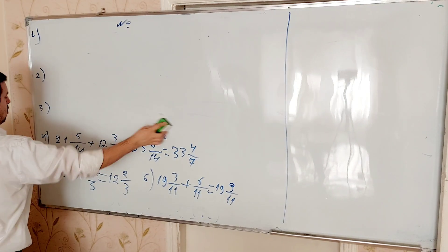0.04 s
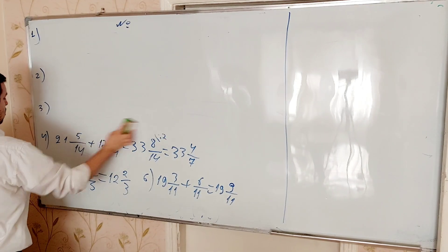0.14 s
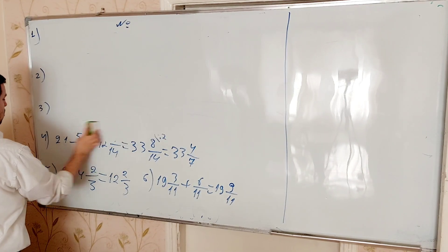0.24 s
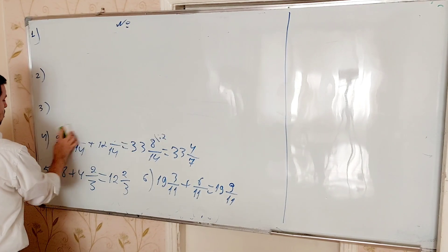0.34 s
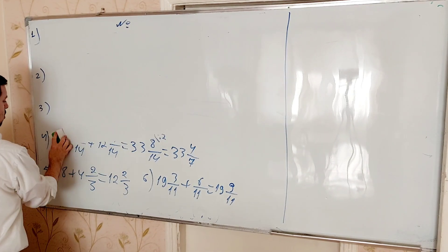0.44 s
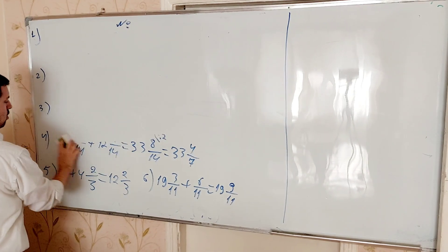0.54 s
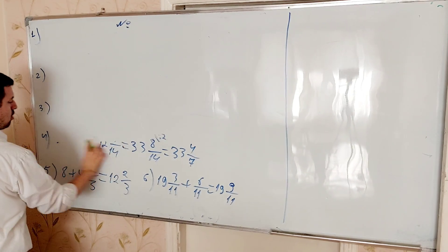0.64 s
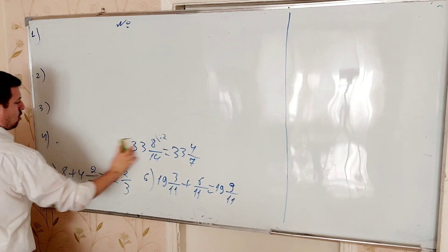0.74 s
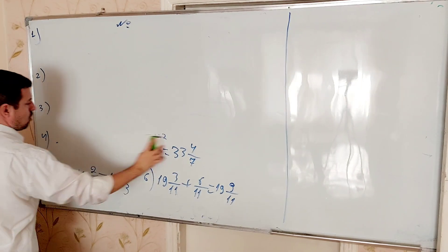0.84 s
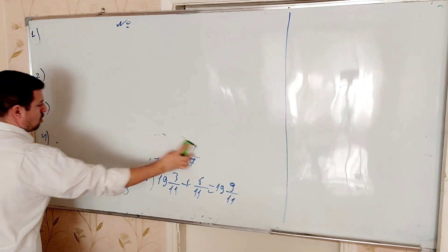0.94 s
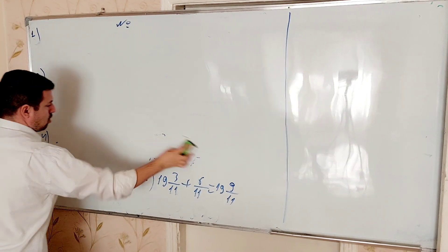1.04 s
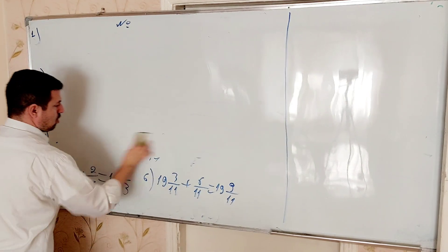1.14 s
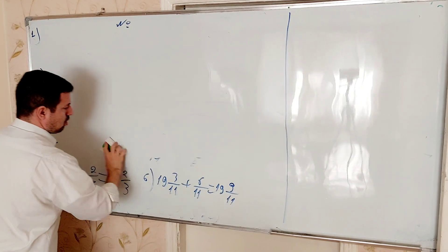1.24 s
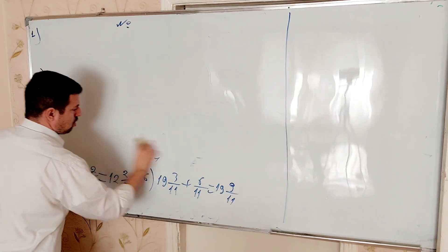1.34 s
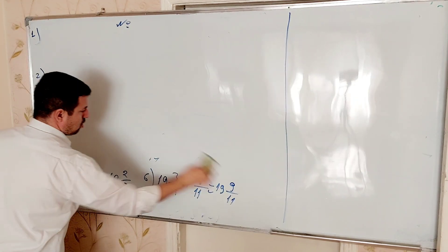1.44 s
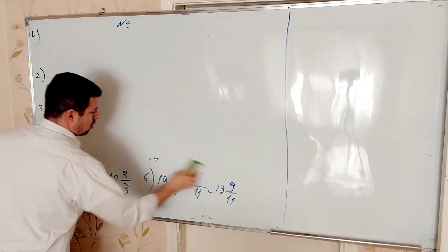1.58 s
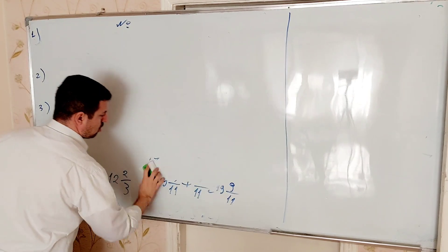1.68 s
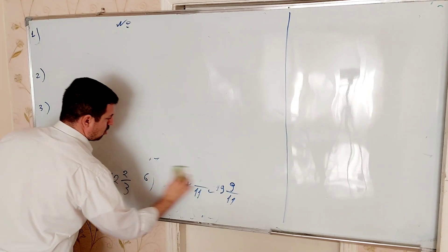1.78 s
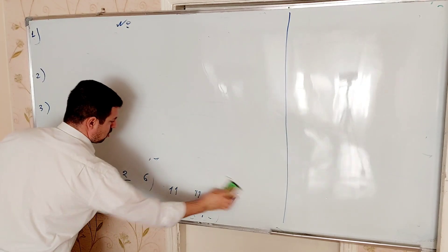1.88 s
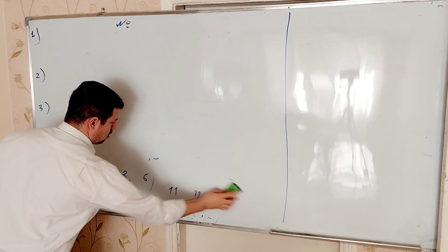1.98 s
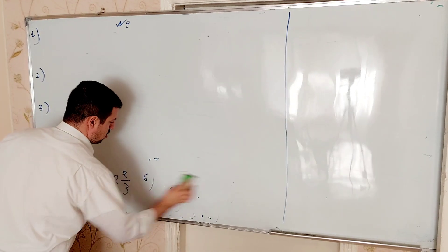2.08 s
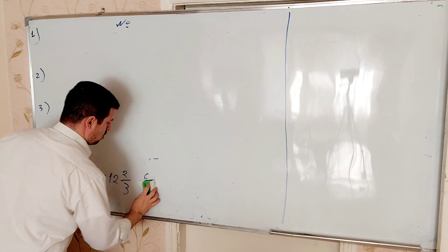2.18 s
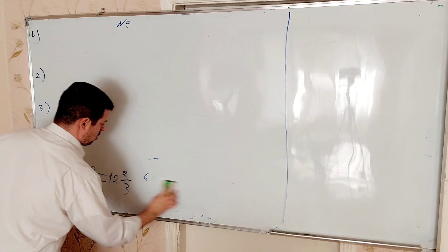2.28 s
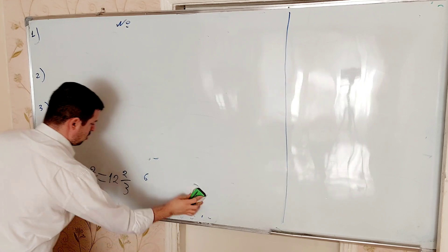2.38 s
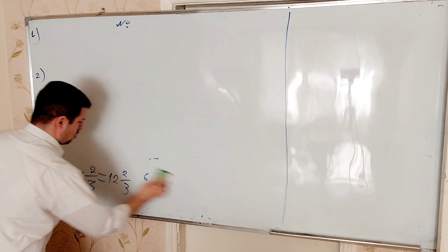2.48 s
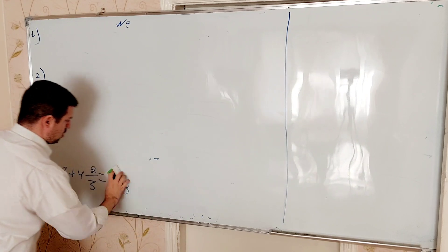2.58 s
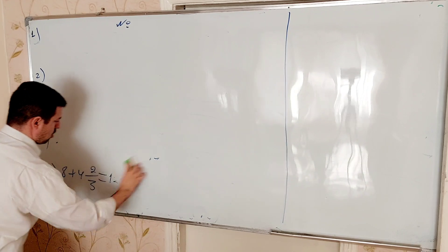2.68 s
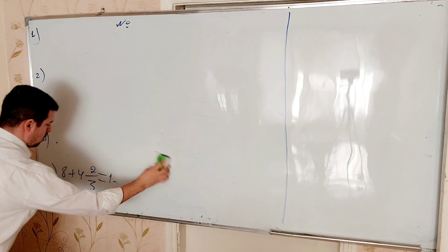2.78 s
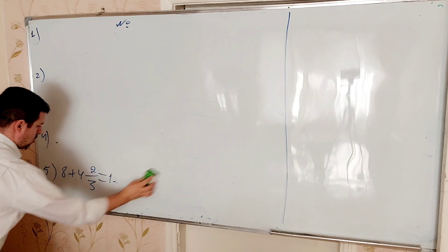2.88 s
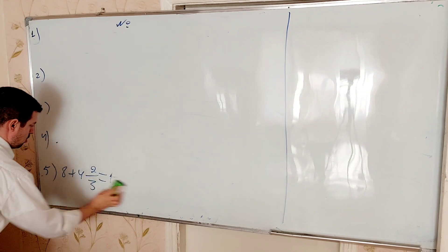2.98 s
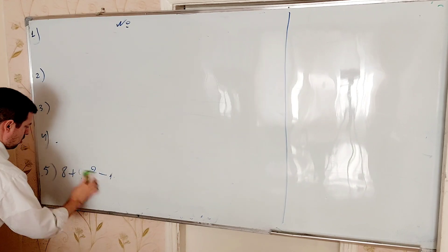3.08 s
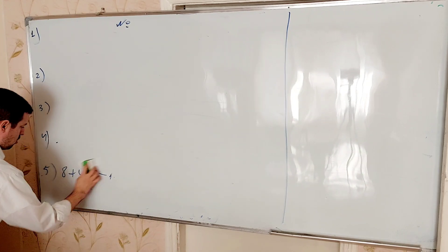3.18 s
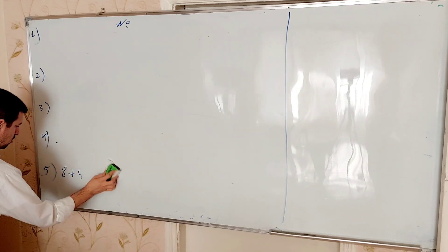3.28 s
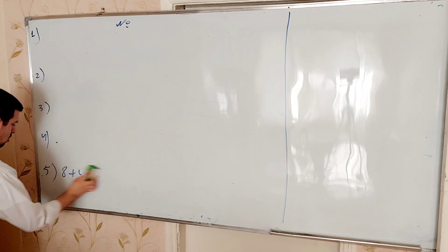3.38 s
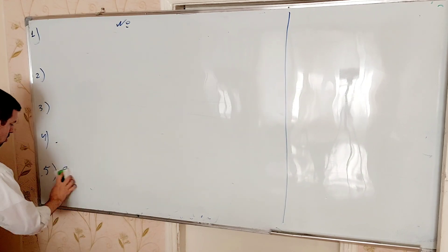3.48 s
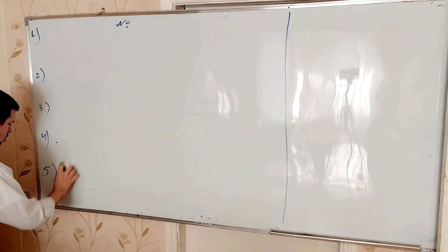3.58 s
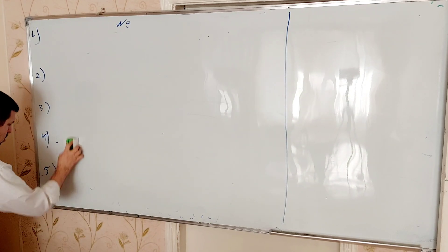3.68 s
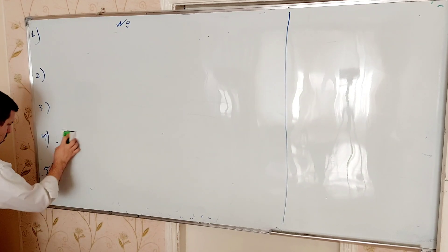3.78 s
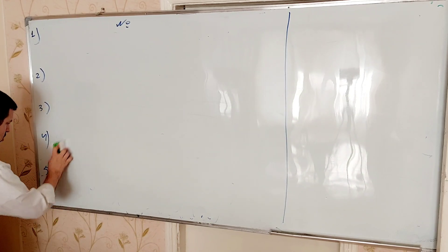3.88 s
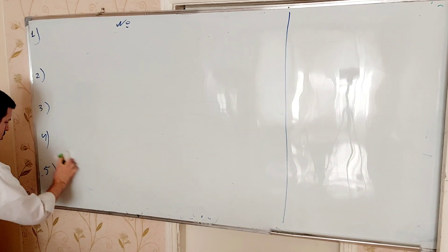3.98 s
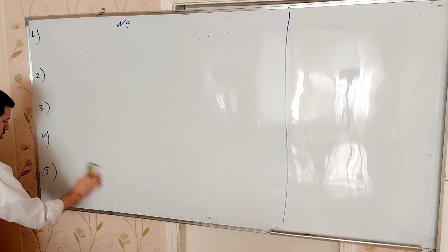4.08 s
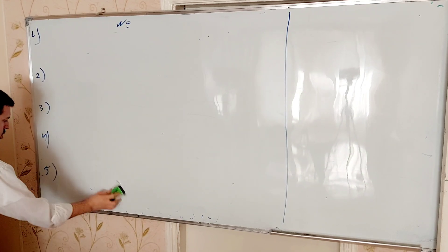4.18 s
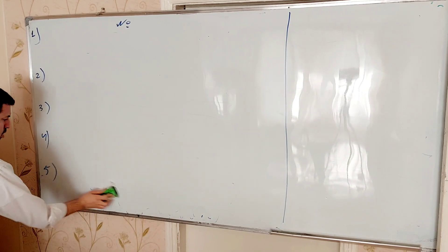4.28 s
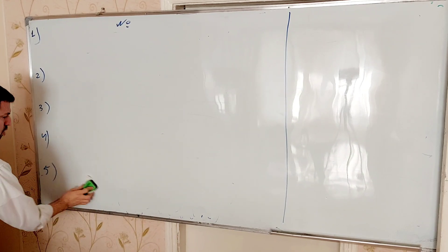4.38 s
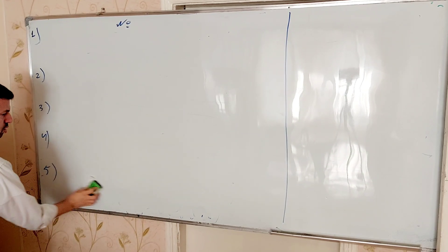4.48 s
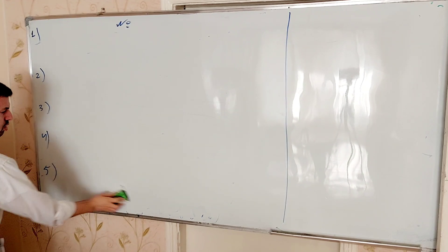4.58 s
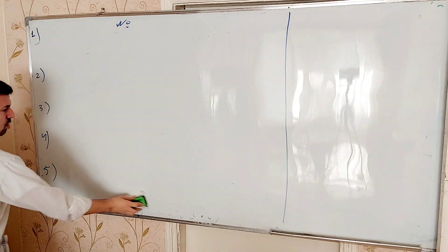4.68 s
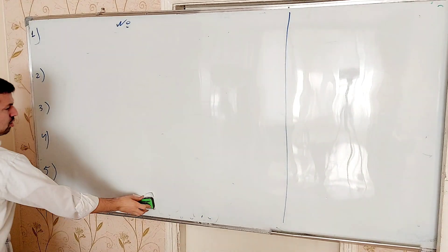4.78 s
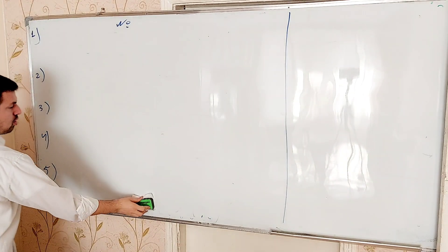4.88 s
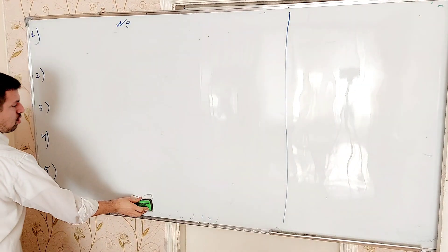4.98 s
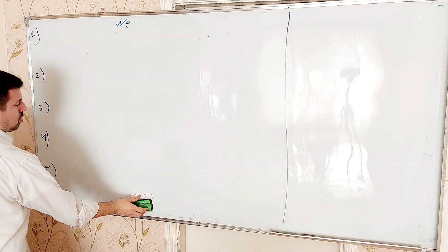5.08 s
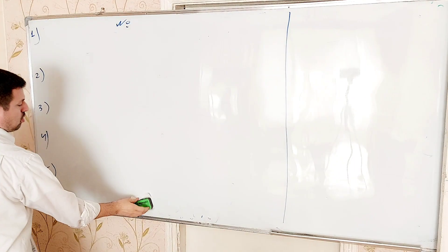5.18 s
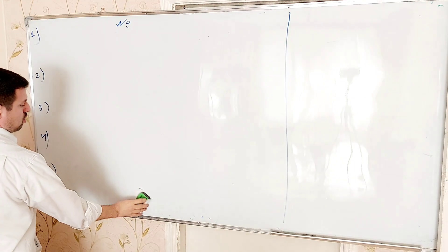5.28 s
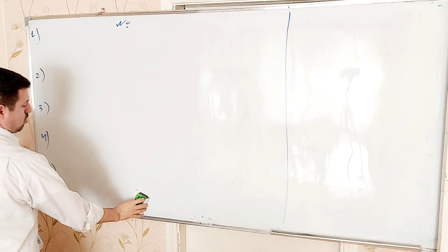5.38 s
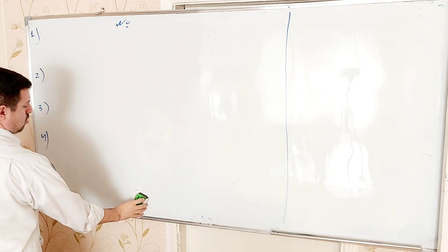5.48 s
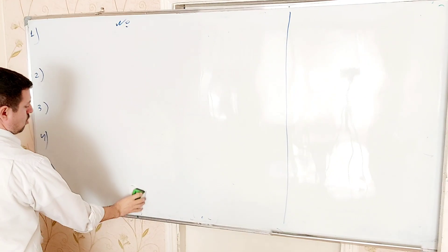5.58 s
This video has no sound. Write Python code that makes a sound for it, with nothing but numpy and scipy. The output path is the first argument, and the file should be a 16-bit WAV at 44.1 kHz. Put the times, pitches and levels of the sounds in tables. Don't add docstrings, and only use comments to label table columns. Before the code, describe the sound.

In a quiet room, a felt eraser wipes a large, thin whiteboard, heard from a few metres away in stereo. At 0 s a firm rub is already ending with a short low rumble; soft, light swishes follow until about 0.8 s. From 0.9 s the wiping gains pressure, with small knocks near 0.95 and 1.05 s. Between 1.4 and 2.4 s it is strongest: quick airy hisses, a hollow drumming of the panel, rough midrange scraping and woody knocks around 1.45, 1.57, 1.85, 2.06 and 2.3 s. Rubbing eases after 2.5 s, with one last clear knock at 2.9 s. From 3 to 4.6 s only light, faint strokes continue, with a small dull bump near 4.2 s. Then tiny bright creaks at about 4.85 and 5.05 s and barely audible sleeve brushes sit over low building murmur and faint microphone hiss until 5.6 s.

```python
import sys
import numpy as np
from scipy import signal
from scipy.fft import rfft, irfft, next_fast_len
from scipy.io import wavfile
from scipy.ndimage import uniform_filter1d

SR = 44100
rng = np.random.default_rng(int(sys.argv[2]) if len(sys.argv) > 2 else 0)


def generate_wav(signal):
    frames = np.transpose(np.atleast_2d(signal))
    scaled = np.clip(frames, -1, 1) * 32767
    pcm = np.round(scaled).astype(np.int16)
    wavfile.write(sys.argv[1], SR, pcm)


def to_linear_factor(level_db):
    exponent = np.asarray(level_db, float) / 20
    return 10 ** exponent


N = 248724


def evened(x):
    return x / np.sqrt(np.mean(x ** 2) + 1e-20)


def read(points, hz):
    f, value = np.transpose(points)
    return np.interp(np.log(hz + 1), np.log(f + 1), value)


def follow(curve, t):
    s, value = np.transpose(curve)
    return np.interp(t, s, value)


def resonate(x, hz, width):
    turn = np.exp(2j * np.pi * np.cumsum(hz * np.ones(len(x))) / SR)
    r = np.exp(-np.pi * width / SR)
    return 2 * (turn * signal.lfilter([1 - r], [1, -r], x * turn.conj())).real


def coloured(x, colour):
    hz = np.abs(np.fft.fftfreq(8192, 1 / SR))
    log_gain = np.log(to_linear_factor(read(colour, hz)))
    phase = -signal.hilbert(log_gain).imag
    taps = np.fft.ifft(np.exp(log_gain + 1j * phase)).real[:4096]
    return signal.oaconvolve(x, taps / np.linalg.norm(taps))[:len(x)]


def gestures(rows, t, rest_db, tilt, shape):
    s, rise, fall, db, *colour = np.transpose(rows)[:, :, None]
    away = np.abs(t - s) / np.maximum(np.where(t < s, rise, fall), .005)
    level_db = db + tilt * sum(colour) - 12 * away ** shape
    power = to_linear_factor(2 * np.maximum(level_db, -200)).sum(axis=0)
    return 10 * np.log10(power + to_linear_factor(2 * rest_db))


# (frequency [Hz], likeness [0 to 1])
LIKENESS = [(30, .55), (60, .62), (130, .88), (290, .72), (640, .58), (1200, .05), (3100, 0), (15000, 0)]


def pair(frames, size, patchy_db):
    hz, t = np.fft.rfftfreq(size, 1 / SR), np.arange(frames) * (size // 4) / SR
    a, b, c, d, patches = rng.standard_normal((frames, len(hz), 5)).T
    patches = uniform_filter1d(patches, size=size // 64, axis=0)
    patches = evened(uniform_filter1d(patches, size=12, axis=1))
    same = np.clip(read(LIKENESS, hz), -1, 1)[:, None]
    left = a + 1j * b
    right = same * left + np.sqrt(1 - same ** 2) * (c + 1j * d)
    return hz[:, None], t, np.array([left, right]) * to_linear_factor(patchy_db * patches)


def unfold(z, size):
    return signal.istft(z, nperseg=size, noverlap=size * 3 // 4)[1]


def lean(left_right_db):
    return np.array([to_linear_factor(left_right_db / 2), to_linear_factor(-left_right_db / 2)])


# (frequency [Hz], level per Hz [dB])
ROOM = [(20, -7.5), (60, 7.5), (130, 3.5), (250, -2), (330, -3.5), (500, -36), (1000, -11.5), (2000, -18),
        (3200, -26), (6000, -42), (7300, -27), (8800, -22.5), (10500, -32), (15800, -33)]
# (frequency [Hz], left minus right [dB])
ROOM_SIDE = [(60, 13), (300, 18), (1400, -2), (3100, 2.5), (6800, -3), (15000, 9)]


def room_tone():
    hz, t, z = pair(frames=N // 256 + 5, size=1024, patchy_db=3.0)
    z = z * to_linear_factor(read(ROOM, hz)) * lean(read(ROOM_SIDE, hz))
    return to_linear_factor(-64.5) * evened(unfold(z, size=1024)[:, :N])


# (fastest moment [s], speeding up [s], slowing down [s], hiss level [dB])
STROKES = [(0.0, .05, .04, -69), (0.134, .137, .29, -66), (0.662, .177, .268, -69),
           (0.935, .179, .088, -68.5), (1.137, .115, .12, -60.5), (1.439, .133, .085, -57),
           (1.592, .064, .09, -58), (1.934, .2, .09, -57), (2.08, .109, .163, -61.5),
           (2.294, .054, .095, -62), (2.499, .1, .122, -62), (2.692, .112, .146, -68),
           (2.922, .09, .272, -65), (3.233, .145, .087, -70), (3.415, .14, .096, -69),
           (3.641, .132, .135, -70), (3.892, .14, .13, -73), (4.12, .152, .12, -68),
           (4.332, .085, .104, -75), (4.549, .099, .171, -72.5), (5.3, .5, .3, -90),
           (5.589, .077, .138, -84)]
# (frequency [Hz], level per Hz [dB])
FELT = [(900, -7.5), (1500, -18), (2600, -11.5), (3500, -5), (4600, -2), (6300, -4.5), (8200, -3),
        (9600, -7.5), (10500, -6), (12500, -3), (14500, -6.5), (15800, -4.5)]
# (frequency [Hz], left minus right [dB])
FELT_SIDE = [(1500, 9), (4000, -1.1), (8000, 2), (9500, 0), (12000, -7.5), (15000, -4)]


def felt():
    hz, t, z = pair(frames=N // 64 + 5, size=256, patchy_db=1.34)
    speed_db = gestures(STROKES, t, rest_db=-92.5, tilt=0, shape=2)
    flicker = evened(uniform_filter1d(rng.standard_normal(len(t)), size=9))
    top = np.clip((hz - 8000) / 3500, 0, 1)
    swell_db = speed_db - uniform_filter1d(speed_db, size=260)
    level_db = speed_db + top * (0.16 * swell_db - 1.8) + 0.56 * flicker
    level = evened(to_linear_factor(read(FELT, hz))) * to_linear_factor(level_db)
    keep = to_linear_factor(-2 * 60 * t[1] / 0.07)
    held = signal.lfilter([1 - keep], [1, -keep], level ** 2)
    level = np.sqrt(0.81 * level ** 2 + 0.17 * held)
    z = z * level * lean(read(FELT_SIDE, hz) + 0.67)
    return to_linear_factor(-13.0) * unfold(z, size=256)[:, :N]


# (hardest moment [s], build-up [s], release [s], pressure [dB], tilt to the lower crowded modes [dB])
PRESSES = [(0.0, .02, 0.062, -40.5, -1), (0.3, 0.42, 0.2, -58.5, -1), (0.78, 0.16, 0.044, -61, 4),
           (0.88, 0.12, 0.032, -50, -11), (0.965, .05, 0.013, -44.5, 4), (1.06, 0.062, 0.095, -56, 7),
           (1.17, 0.089, 0.034, -46, 1), (1.37, 0.12, 0.025, -56.5, 9.5), (1.455, 0.04, 0.032, -35, -1),
           (1.57, 0.2, 0.071, -39, -3.5), (1.72, 0.18, 0.05, -47, -1.5), (1.95, 0.15, 0.074, -37.5, 2.5),
           (2.13, 0.1, 0.19, -45, 2.5), (2.355, 0.035, 0.064, -42.5, 4), (2.45, 0.092, 0.21, -47, -3.5),
           (2.58, 0.15, 0.037, -46.5, -2.5), (2.765, 0.068, 0.084, -47, -9.5),
           (2.895, 0.034, 0.092, -48, -4.5), (3.12, .12, 0.086, -62.5, -1), (3.26, 0.046, 0.22, -59.5, -6),
           (3.42, 0.048, 0.097, -69, 7), (4.22, .08, 0.16, -54.5, -4.5), (4.79, 0.28, 0.034, -63, -3.5),
           (4.9, 0.49, 0.71, -76, 2)]
# (hardest moment [s], build-up [s], release [s], scrape [dB], tilt to the upper modes [dB])
SCRAPES = [(0.0, .02, 0.033, -47, -9), (0.67, .05, 0.17, -66, -9), (0.79, .06, 0.22, -69.5, -21),
           (0.95, 0.036, 0.083, -56, -12), (1.05, 0.12, 0.058, -51, -7.5), (1.16, 0.075, .04, -54, -8.5),
           (1.31, 0.053, 0.069, -50.5, -15), (1.45, 0.047, 0.09, -40.5, -12),
           (1.575, 0.02, 0.047, -46.5, 0.5), (1.66, 0.035, 0.21, -48.5, -12),
           (1.88, 0.047, 0.079, -32, -9.5), (1.93, 0.068, 0.05, -40.5, 2.5), (2.14, .12, 0.19, -46.5, -9.5),
           (2.31, 0.043, 0.073, -37, -15), (2.46, 0.039, 0.1, -47.5, -11.5), (2.76, 0.19, 0.12, -62, -12),
           (2.89, 0.013, 0.095, -48.5, -6), (3.04, 0.17, 0.22, -62, -4.5), (3.18, 0.13, 0.2, -77, 6),
           (3.42, .12, 0.2, -75, -15), (4.19, 0.028, 0.023, -51.5, -27), (4.5, 0.26, 0.42, -77, -14),
           (5.3, 0.9, .4, -77, -12)]


def slips():
    t, steps = np.arange(N) / SR, np.arange(0, N + 64, 64) / SR

    def level_db(rows, rest_db, tilt):
        return np.interp(t, steps, gestures(rows, steps, rest_db, tilt, shape=1.41))

    pressure_db, lower_db = level_db(PRESSES, -88.5, 0), level_db(PRESSES, -79, 1)
    middle_db, upper_db = level_db(SCRAPES, -84, 0), level_db(SCRAPES, -97.5, 1)
    happens = rng.random(N) < 1400 / SR
    size, sign = rng.exponential(1, N), rng.choice([-1., 1.], N)
    push = evened(happens * sign * to_linear_factor(2.3 * np.minimum(size, 4)))
    sway, base = push * to_linear_factor(pressure_db - 24), push * to_linear_factor(pressure_db - 8.5)
    lower = push * to_linear_factor(lower_db - 3.5)
    middle, upper = push * to_linear_factor(middle_db - 15.0), push * to_linear_factor(upper_db - 7.0)
    return sway, base, lower, middle, upper


# (time [s], blow [dB], heft in the bass [dB], sharpness in the upper modes [dB])
KNOCKS = [(0.295, -67.5, 16, -26), (0.661, -58, -18, -11), (0.925, -43, -17, -45), (0.959, -43, -24, -17.5),
          (1.044, -40, -10, -23), (1.298, -54.5, -7, -22), (1.439, -38.5, 3, -33),
          (1.569, -31, -10.5, -15.5), (1.808, -37, -24, -18), (1.86, -33.5, -16, -2), (2.064, -40, -1, -10),
          (2.266, -38, -5.5, -10), (2.294, -30.5, -17, -21), (2.744, -69, 17, -19),
          (2.879, -34, -16.5, -21), (3.24, -63, 8, -8), (4.152, -58.5, -6, -25), (4.769, -70, 11.5, -26)]


def add_knocks(sway, base, lower, middle, upper):
    for s, blow_db, heft_db, sharp_db in KNOCKS:
        at = round(s * SR)
        sway[at] += to_linear_factor(blow_db + 0.73 * heft_db + 7.0)
        base[at] += to_linear_factor(blow_db + heft_db + 24.5)
        lower[at] += to_linear_factor(blow_db + 0.69 * heft_db + 18.5)
        middle[at] += to_linear_factor(blow_db + 10.5)
        upper[at] += to_linear_factor(blow_db + sharp_db + 23)


def humming(drive, modes, low_hz, high_hz):
    cushion = signal.butter(3, [low_hz, high_hz], "bandpass", fs=SR, output="sos")
    soft = signal.sosfilt(cushion, drive)
    hum = []
    for hz, width, db in modes:
        pole = np.exp((2j * np.pi * hz - np.pi * width) / SR)
        hum.append(to_linear_factor(db) * np.sqrt(width) * signal.lfilter([1], [1, -pole], soft).real)
    return to_linear_factor(4.2 * rng.standard_normal((2, len(modes)))) @ np.array(hum)


# (frequency [Hz], time to fall 60 dB [s])
RING = [(100, 0.45), (400, 0.25), (1000, 0.29), (3000, 0.25), (8000, 0.66)]


def ringing(drive, colour, turns_per_s, direct_db):
    t, push, size = np.arange(N) / SR, coloured(drive, colour), next_fast_len(N + 12000)
    waves = 0
    for k in range(4):
        hz, s, z = pair(frames=90, size=512, patchy_db=-1.2)
        decay_db = 60 * s / read(RING, hz)
        tail = unfold(z * to_linear_factor(read(colour, hz) / 4 - decay_db), size=512)
        tail /= np.linalg.norm(tail, axis=1, keepdims=True)
        turn = np.sqrt(.5) * np.cos(np.pi * (turns_per_s * t + k / 4))
        waves = waves + rfft(push * turn, size) * rfft(tail, size)
    first = to_linear_factor(direct_db) * np.array([push, np.roll(push, 6)])
    return first + irfft(waves, size)[:, :N]


# (frequency [Hz], width [Hz], level [dB])
LOW_LINES = [(124, 14, -13), (140, 16, -7), (171, 11, 2), (196, 20, -13), (222, 20, -9)]
# (frequency [Hz], width [Hz], level [dB])
LOWER_LINES = [(261.4, 5.7, -21), (271.7, 66, 7), (349, 57, -11), (387, 64, -10.5), (410.2, 31, -5),
               (508, 106, -4.5)]
# (frequency [Hz], level [dB])
LOWER = [(150, -41.5), (235, 5.5), (400, 2), (520, -2.5), (750, -36.5)]
# (frequency [Hz], level [dB])
SWAY = [(15, -26), (30, -11), (45, -8), (62, 0), (85, -10), (125, -50)]
# (frequency [Hz], level [dB])
BASE = [(80, -50), (125, -6), (170, 0), (230, -4), (330, -45)]
# (frequency [Hz], level [dB])
MIDDLE = [(320, -40), (450, 0), (620, 0), (850, -2), (1100, -5), (1500, -14), (2400, -42), (4000, -80)]
# (frequency [Hz], level [dB])
UPPER = [(700, -45), (1000, -9), (1350, 0), (1700, -1.5), (2100, -2.5), (3000, -8), (4500, -14),
         (7000, -24), (11000, -60)]
# (time [s], frequency of the modes it favours [Hz])
SPOT = [(0, 555), (1.0, 574), (1.7, 640), (1.9, 800), (2.05, 583), (2.3, 760), (2.55, 540), (2.88, 865),
        (3.2, 585), (4.2, 485), (5.64, 626)]
# (time [s], left minus right [dB])
HAND_SIDE = [(0, 0), (1.2, -0.5), (2.6, -0.5), (3.2, 2), (5.64, 1.5)]


def panel():
    t = np.arange(N) / SR
    sway, base, lower, middle, upper = drives = slips()
    add_knocks(*drives)
    lines = to_linear_factor(-35.5) * humming(base, LOW_LINES, 107.8, 243)
    lines += to_linear_factor(-42.5) * humming(lower, LOWER_LINES, 216, 663)
    body = to_linear_factor(-6.5) * ringing(lower, LOWER, turns_per_s=4.7, direct_db=-30.5)
    body += ringing(sway, SWAY, turns_per_s=3.21, direct_db=-4)
    body += to_linear_factor(-14.0) * ringing(base, BASE, turns_per_s=3.1, direct_db=-16)
    spot_hz = follow(SPOT, t)
    favoured = resonate(resonate(middle, spot_hz, 597), spot_hz, 605)
    middle = to_linear_factor(-35) * middle + to_linear_factor(1.0) * favoured
    body += ringing(middle, MIDDLE, turns_per_s=11.3, direct_db=7.0)
    body += ringing(upper, UPPER, turns_per_s=21.1, direct_db=-4.2)
    return (lines + body) * lean(follow(HAND_SIDE, t))


# (time [s], level [dB], frequency [Hz])
TICKS = [
    (4.8643, -65, 8500),
    (4.9194, -78, 8750),
    (5.059, -62, 8900),
]
# (time [s], length [s], level [dB], frequency [Hz], width [Hz])
BRUSHES = [
    (4.03, .14, -82, 2250, 900),
    (5.53, .16, -77, 2150, 450),
    (.65, .08, -70, 1200, 700),
    (5.18, .2, -83, 8000, 3200),
    (5.04, .12, -85, 8300, 3200),
    (5.5, .13, -83, 8300, 3400),
    (4.84, .12, -86, 8200, 3200),
]


def holder_and_sleeve():
    out, t = np.zeros(N + SR), np.arange(900) / SR
    for s, db, hz in TICKS:
        snap = rng.standard_normal(len(t)) * np.exp(-t / 0.0063)
        creak = 0.18 * np.gradient(snap) + resonate(snap, hz, 2500)
        out[round(s * SR):][:len(t)] += to_linear_factor(db - 5.5) * creak
    for s, length, db, hz, width in BRUSHES:
        cloth = rng.standard_normal(SR // 4)[:round(length * SR)]
        rub = evened(resonate(resonate(cloth, hz, width), hz, width))
        out[round(s * SR):][:len(cloth)] += to_linear_factor(db) * rub * np.hanning(len(cloth))
    return np.array([to_linear_factor(4.5) * out[:N], to_linear_factor(-2.0) * out[7:N + 7]])


def scene():
    return felt() + panel() + holder_and_sleeve() + room_tone()


def top_cut(x):
    return signal.sosfilt(signal.butter(12, 15740, fs=SR, output="sos"), x)


def record(dry):
    return top_cut(dry)


dry = scene()
out = record(dry)
generate_wav(out)
```